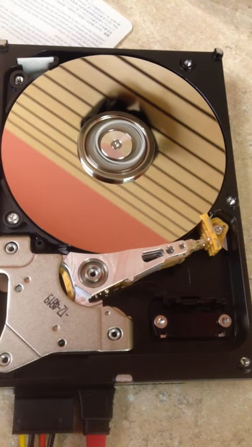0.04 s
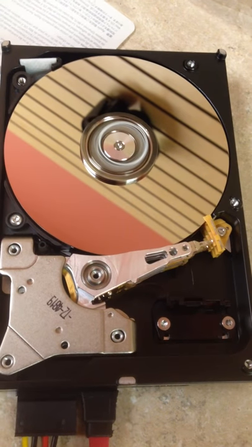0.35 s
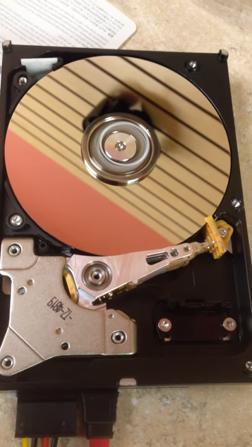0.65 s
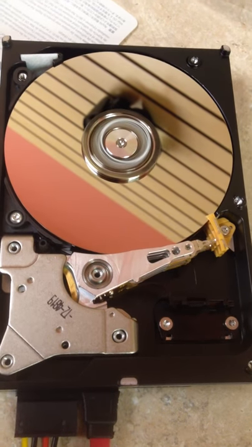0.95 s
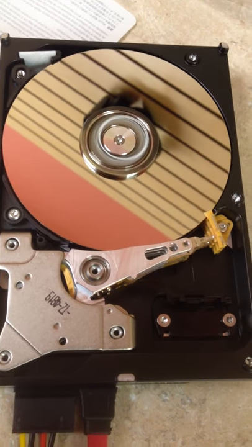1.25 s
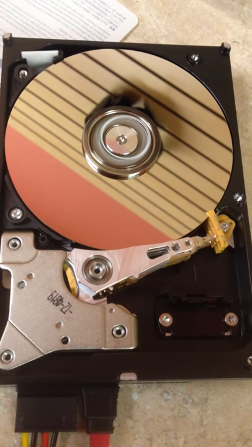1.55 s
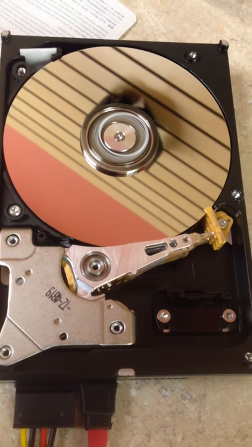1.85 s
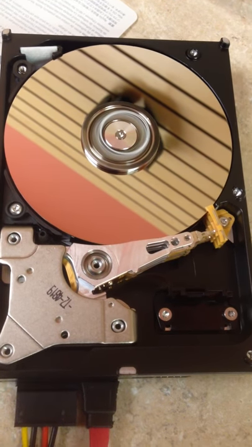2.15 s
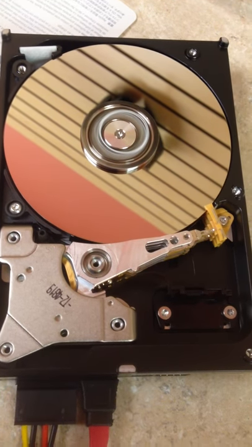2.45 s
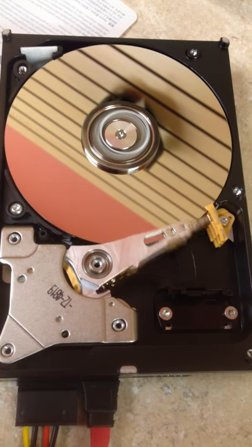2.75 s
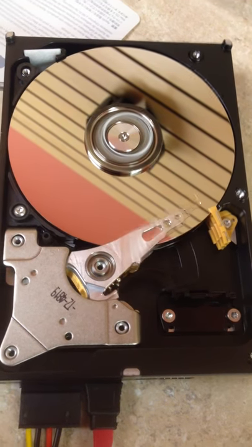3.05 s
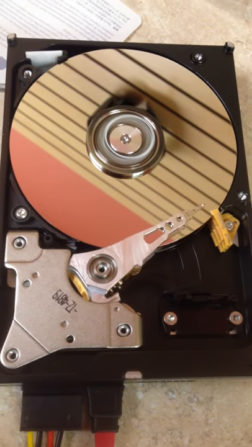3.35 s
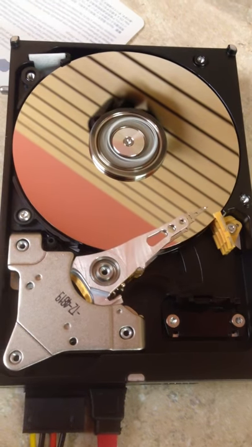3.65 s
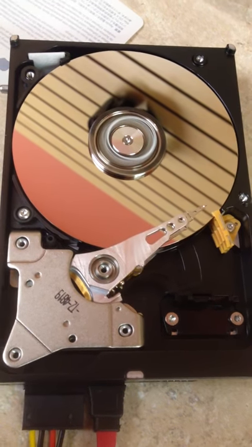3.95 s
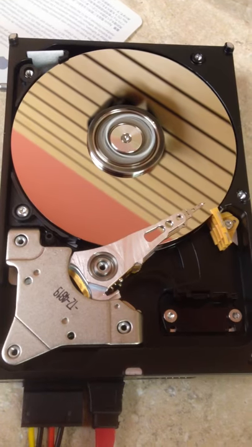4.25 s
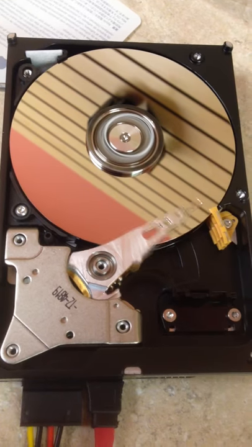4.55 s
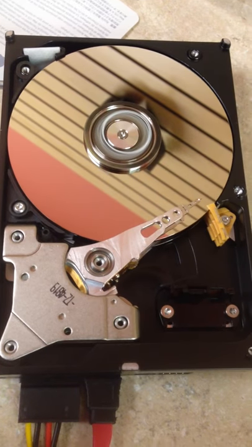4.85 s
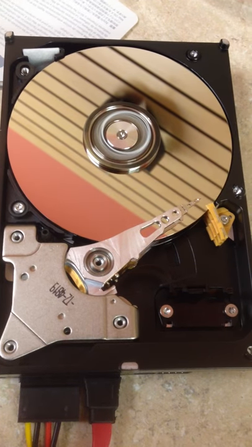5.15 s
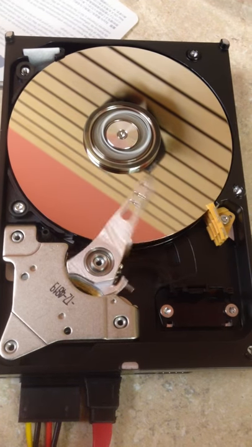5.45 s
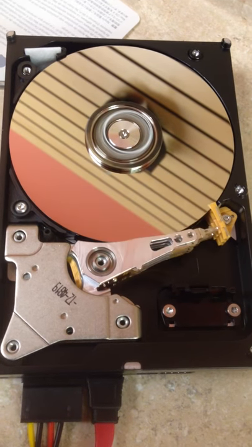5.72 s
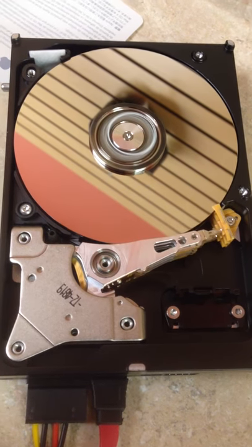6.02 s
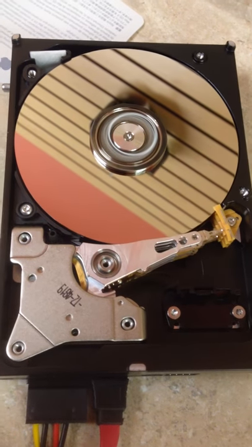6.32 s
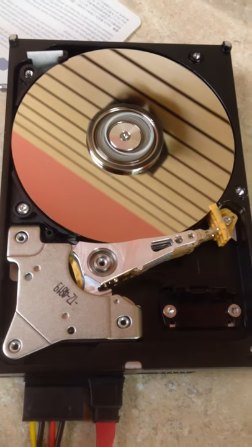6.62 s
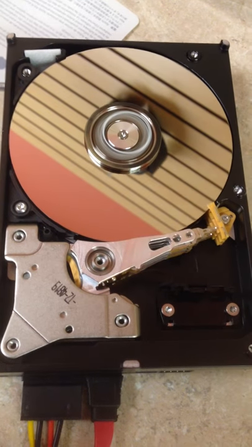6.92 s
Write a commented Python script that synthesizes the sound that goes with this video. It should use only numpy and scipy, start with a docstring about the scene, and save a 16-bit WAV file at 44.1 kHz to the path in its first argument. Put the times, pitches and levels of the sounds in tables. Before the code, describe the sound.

Sharp, irregular metallic clacks from an opened hard drive's head arm cut through the soft, airy whir of its spinning platters.

```python
"""A steady, airy whir: an opened, faulty hard drive spins on a counter, close to a hand-held phone.
Air dragged by the platters stirs the chassis, over the low rumble of a quiet room. The spindle hums
and twice pulls back up to speed, and handling the phone adds soft, low knocks and thuds. The head arm
hits its stops in short, rattling clacks that ring through the case, and its coil whines faintly."""
import sys
import numpy as np
from scipy import signal
from scipy.fft import rfft, irfft
from scipy.io import wavfile
from scipy.ndimage import uniform_filter1d, minimum_filter1d

SR = 44100
rng = np.random.default_rng(int(sys.argv[2]) if len(sys.argv) > 2 else 0)


def master_out(mix):
    """Clip the mix to full scale and print it as 16-bit PCM to the path in sys.argv[1]."""
    frames = np.transpose(np.atleast_2d(mix))
    ceiling = np.clip(frames, -1, 1)
    pcm = np.round(ceiling * 32767).astype(np.int16)
    wavfile.write(sys.argv[1], SR, pcm)


N = 312228
TIME = np.arange(N) / SR
SPINDLE_HZ = 479  # motor tone at full speed, four cycles to a turn


def undb(db):
    """Decibels to gain."""
    return 10 ** (np.asarray(db) / 20)


def unit(x):
    """Scale to rms 1."""
    return x / np.sqrt(np.mean(x ** 2))


def fade(t, t60):
    """Exponential decay, 60 dB down at t60."""
    return np.exp(-np.log(1000) * t / t60)


def colour(points, hz):
    """Gain of an EQ curve of (freq_hz, level_db) points at the given frequencies."""
    freq_hz, level_db = np.transpose(points)
    return undb(np.interp(np.log(hz + 1), np.log(freq_hz), level_db))


def resonance(hz, centre_hz, width_hz):
    """Complex response of one band-pass resonance."""
    return 1j * hz * width_hz / (centre_hz ** 2 - hz ** 2 + 1j * hz * width_hz)


def shape(x, response):
    """Filter a sound by a function of frequency."""
    return irfft(rfft(x) * response(np.fft.rfftfreq(len(x), 1 / SR)), len(x))


def minimum_phase(points, size=512):
    """Tightest impulse response with the given EQ curve."""
    cepstrum = irfft(np.log(colour(points, np.fft.rfftfreq(size, 1 / SR))))
    cepstrum[1:size // 2] *= 2
    cepstrum[size // 2 + 1:] = 0
    return irfft(np.exp(rfft(cepstrum)))


def lift(x, db, edges_hz, kind, order=3):
    """Boost or cut one band by db."""
    band = signal.butter(order, edges_hz, kind, fs=SR, output="sos")
    return x + (undb(db) - 1) * signal.sosfiltfilt(band, x, padtype=None)


def walk(rate_hz):
    """Smooth random drift of rms 1."""
    hold = int(SR / rate_hz)
    steps = np.repeat(rng.standard_normal(N // hold + 1), hold)
    return unit(uniform_filter1d(uniform_filter1d(steps, hold), hold)[:N])


def swell(start_s, end_s, edge_s):
    """On between two times, with soft edges."""
    return np.clip(np.minimum(TIME - start_s, end_s - TIME) / edge_s, 0, 1)


def add(out, start_s, sound):
    """Mix a sound in at start_s."""
    i = int(start_s * SR)
    out[i:i + len(sound)] += sound[:N - i]


def whir(flutter_db=.5, drift_db=0.73, pulse_depth=0.043):
    """Turbulence over the platters excites the chassis, pulsing a little with each turn."""
    # chassis and platter resonances stirred by the air: centre_hz, width_hz, gain_db
    bands = [(821, 63, -14.5), (1294, 515, -6.5), (1510, 284, 0), (2010, 353, 0), (2402, 127, -0.5),
             (2510, 76, 1.5), (3147, 160, -1), (3318, 310, -4), (3773, 470, -6.5), (4016, 170, -8),
             (6300, 770, -17.5), (7330, 860, -9.5), (7920, 410, -14)]
    # smooth rush of air under them: freq_hz, gain_db
    air_eq = [(200, -23.5), (400, -20), (700, -19.5), (1100, -30), (2800, -17.5), (4800, -17), (6500, -16),
              (8600, -20), (10200, -27.5), (12000, -29.5), (15500, -31)]
    # fader curve of the whir: time_s, level_db
    fader = [(0.0, -50), (1.0, -49.5), (2.81, -49.5), (5.38, -50), (6.38, -51), (7.05, -49.5)]

    def response(hz):
        ring_power = sum((undb(db) * abs(resonance(hz, centre_hz, width_hz)) ** 2) ** 2
                         for centre_hz, width_hz, db in bands)
        return np.sqrt(ring_power + colour(air_eq, hz) ** 2)
    flow_db = np.interp(TIME, *np.transpose(fader)) + flutter_db * walk(25) + drift_db * walk(1.2)
    turn_hz = SPINDLE_HZ / 4
    pulsing = 1 + pulse_depth * np.sin(2 * np.pi * turn_hz * TIME)
    return undb(flow_db) * pulsing * unit(shape(rng.standard_normal(N), response))


def rumble(trim_db=-1, surge_db=1.17, hum_db=-65, mains_hz=60.2):
    """Low, uneven room tone with a steady mains hum."""
    # tone of the room: freq_hz, gain_db
    room_eq = [(20, -11), (40, -7.5), (60, 2.5), (85, -1), (120, -6), (180, -12.5), (280, -18.5),
               (500, -24.5), (1500, -57)]
    # fader curve of the rumble, ahead of the trim: time_s, level_db
    fader = [(0.1, -58), (1.37, -60), (1.48, -53.5), (1.52, -58), (2.18, -63), (3.44, -54.5), (3.46, -62),
             (5.4, -57), (5.61, -62.5), (6.21, -58.5), (6.98, -62), (7.0, -56.5)]
    noise = unit(shape(rng.standard_normal(N), lambda hz: colour(room_eq, hz)))
    level_db = np.interp(TIME, *np.transpose(fader)) + trim_db + surge_db * walk(8.2)
    hum = np.sqrt(2) * np.sin(2 * np.pi * mains_hz * TIME)
    return undb(level_db) * noise + undb(hum_db) * hum


def spindle(steady_db=-78, waver_db=1.0):
    """A weak motor tone, and a stronger one that climbs while the motor pulls back up to speed."""
    # the spindle regaining speed: start_s, end_s, from_hz, level_db
    spin_ups = [(0.322, 0.954, 443, -69), (6.423, 7.006, 446, -69.5)]
    out = undb(steady_db - waver_db * walk(25)) * np.sin(2 * np.pi * SPINDLE_HZ * TIME)
    for start_s, end_s, from_hz, level_db in spin_ups:
        pitch_hz = np.interp(TIME, [start_s, end_s], [from_hz, SPINDLE_HZ + 3])
        glide = np.sin(2 * np.pi * np.cumsum(pitch_hz) / SR)
        out += undb(level_db) * swell(start_s, end_s, edge_s=0.19) * glide
    return np.sqrt(2) * out


def handling(knock_t60=0.028, thud_t60=0.073, thud_hz=130, size=8192):
    """Handling the phone makes dull, heavily damped knocks, each with a longer thud beneath."""
    # soft, low knocks and thuds from handling the phone: start_s, knock_db, knock_hz, thud_db
    cues = [(.097, -64, 300, -53), (2.166, -48.5, 335, -63), (4.655, -47.5, 283.1, -50),
            (4.682, -43, 433, -46), (5.125, -65, 300, -55), (5.720, -51.5, 350, -52),
            (5.808, -60, 330, -60), (6.161, -54.5, 600, -49), (6.469, -55.5, 460, -62),
            (6.598, -61, 400, -51.5)]
    out, t = np.zeros(N), np.arange(size) / SR
    for start_s, knock_db, knock_hz, thud_db in cues:
        for level_db, pitch_hz, t60 in (knock_db, knock_hz, knock_t60), (thud_db, thud_hz, thud_t60):
            push = rng.standard_normal(size) * fade(t, t60)
            body = shape(push, lambda hz: resonance(hz, pitch_hz, width_hz=pitch_hz) ** 3)
            peak_rms = np.sqrt(uniform_filter1d(body ** 2, 220).max())  # loudest 5 ms
            add(out, start_s, undb(level_db) * body / peak_rms)
    return out


def chatter(length_s, swell_db, spacing_s=.003, jitter_s=.0002, scatter_db=3.1, soften_db_per_s=550):
    """Uneven contacts of one clack (delay_s, level_db, treble_db), duller as the arm presses home."""
    delay_s = np.linspace(0, length_s, 1 + round(length_s / spacing_s))
    from_middle_s = delay_s - delay_s.mean()
    level_db = swell_db * from_middle_s / max(length_s, spacing_s)
    contacts = np.transpose([delay_s, level_db, -soften_db_per_s * from_middle_s])
    return contacts + rng.standard_normal(contacts.shape) * [jitter_s, scatter_db, 0]


def strike(t, crack_db=-2, crack_t60=0.012, low_cut_hz=1220, detune=.003, scatter_db=2.5):
    """One contact: the modes ring in shares that vary with the spot hit, over a short crack."""
    # ringing modes of the arm and case: pitch_hz, t60_s, gain_db
    modes = [(425, .06, -33), (520, .055, -28), (1335, .03, -19), (1420, .035, -17), (1852, .03, -13),
             (2026, .03, -15), (2395, .018, -12), (2531, .027, 0), (2740, .016, -11), (3100, .028, -14),
             (3320, .03, -10), (3565, .022, -17), (4038, .028, -16), (5250, .02, -21), (5554, .02, -18),
             (5840, .02, -22), (6416, .02, -19), (6668, .02, -18), (6872, .02, -16), (7940, .016, -28),
             (8490, .016, -27)]
    # crowded, quickly damped modes that give the crack: freq_hz, gain_db
    crack_eq = [(100, -22.5), (600, -42), (1050, -24), (1420, -11), (2100, 3.5), (2600, 6.5), (3400, -8.5),
                (4600, -11.5), (5600, -20.5), (6900, -11), (7400, -18), (9000, -21), (11200, -31),
                (15000, -47)]
    pitch_hz, t60_s, gain_db = np.transpose(modes)[:, :, None]
    share, shift, phase = rng.standard_normal((3, len(modes), 1))
    pitch_hz = pitch_hz * (1 + detune * shift)
    gain_db = gain_db + scatter_db * share
    partials = undb(gain_db) * fade(t, t60_s) * np.sin(2 * np.pi * (pitch_hz * t + phase))
    # the small arm radiates no bass; only the case's slow modes sound down there
    high = pitch_hz[:, 0] > 1000
    low_cut = signal.butter(4, low_cut_hz, "high", fs=SR, output="sos")
    ring = signal.sosfilt(low_cut, partials[high].sum(axis=0)) + partials[~high].sum(axis=0)
    burst = rng.standard_normal(len(t)) * fade(t, crack_t60)
    crack = signal.fftconvolve(burst, minimum_phase(crack_eq))[:len(t)]
    return unit(ring) + undb(crack_db) * unit(crack)


def arm(hard_hz=4600, weight_hz=(1330, 1950), ring_hz=(2360, 2600), build_s=0.00094, size=4096):
    """The arm chatters against its stop; harder contacts are brighter, heavier ones stir the case more."""
    # the arm hitting a stop: start_s, chatter_s, level_db, swell_db (across the chatter),
    # hard_db (treble boost), weight_db (case boost), ring_db (boost of the arm's main mode)
    clacks = [(1.2660, .0066, -29, 4, 0.5, -3, 5.5), (1.2767, 0.0015, -25, -1, -2, -1, -0.5),
              (3.0918, 0.0063, -37, 3, 1.5, 4.5, 5.5), (3.1406, 0.0019, -28.5, 7, 5.5, 1.5, 7),
              (3.843, 0.01, -26, 0.5, 6, 2, 0), (3.8935, .0075, -37, 2, 2, -2, 6.5),
              (3.9413, 0.0013, -50, 0, 5, 2, -4), (4.6331, .0190, -21.3, 1.5, 3.5, 3.5, 1.5),
              (4.6920, 0, -47, 0, -7, -5, -1), (4.736, 0, -46, 1, -7, 1, 4),
              (5.552, 0.0024, -52.5, 2, -3, 4, 2), (5.708, 0.0015, -53.5, -2, -2, 0, 2)]
    out, t = np.zeros(N), np.arange(size) / SR
    lead_s, span_s = .01, .03
    attack = 1 - np.exp(-(t / build_s) ** 2)  # the ring builds as the blow spreads through the case
    for start_s, chatter_s, level_db, swell_db, hard_db, weight_db, ring_db in clacks:
        clack = np.zeros(2 * size)
        for delay_s, contact_db, treble_db in chatter(chatter_s, swell_db):
            hit = strike(t) * attack
            hit /= np.sqrt(np.mean(hit[:176] ** 2))  # levelled on its first 4 ms
            hit = lift(hit, hard_db + treble_db, hard_hz, "high")
            add(clack, lead_s + delay_s, undb(contact_db) * hit)
        clack = lift(clack, weight_db, weight_hz, "band")
        clack = lift(clack, ring_db, ring_hz, "band", order=1)
        span_rms = np.sqrt(np.sum(clack ** 2) / (span_s * SR))
        add(out, start_s - lead_s, undb(level_db) * clack / span_rms)
    return out


def room(x, early_db=-17, early_t60=0.096, late_db=-25, late_t60=0.22, predelay_s=0.00354, size=16384):
    """Quick reflections off the counter and a faint tail from the walls."""
    t = np.arange(size) / SR
    early, late = (unit(rng.standard_normal(size) * fade(t, t60) * (t > predelay_s))
                   for t60 in (early_t60, late_t60))
    impulse = (undb(early_db) * early + undb(late_db) * late) / np.sqrt(size)
    return signal.fftconvolve(x, impulse)[:N]


def coil(waver_hz=2.5):
    """Thin whines from the arm's coil while the servo hunts for a track."""
    # servo whines: start_s, end_s, pitch_hz, level_db
    whines = [(3.436, 3.588, 2440, -59.5), (4.085, 4.148, 8340, -61), (4.37, 4.616, 2437, -59.5),
              (4.885, 4.935, 8320, -63), (5.11, 5.44, 2426, -58)]
    phase_drift = waver_hz * np.cumsum(walk(30.64)) / SR
    out = np.zeros(N)
    for start_s, end_s, pitch_hz, level_db in whines:
        tone = np.sin(2 * np.pi * (pitch_hz * TIME + phase_drift))
        out += undb(level_db) * swell(start_s, end_s, edge_s=0.01) * tone
    return np.sqrt(2) * out


def scene():
    """The drive and its room in mono, with reverb on the clacks alone."""
    bed = whir() + rumble() + spindle() + handling()
    clacks = arm()
    return (bed + clacks + room(clacks) + coil())[None]


def record(dry, ceiling_db=-10, top_hz=15350, window=132):
    """The phone ducks smoothly around the loudest peaks and rolls off the top."""
    needed_gain = np.minimum(1, undb(ceiling_db) / (np.abs(dry) + 1e-9))
    limiter_gain = uniform_filter1d(minimum_filter1d(needed_gain, window), window)
    low_pass = signal.ellip(10, .2, 70, top_hz, fs=SR, output="sos")
    return signal.sosfilt(low_pass, dry * limiter_gain)


dry = scene()
out = record(dry)
master_out(out)
```